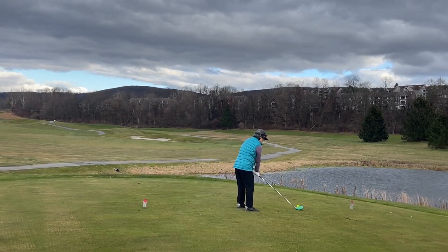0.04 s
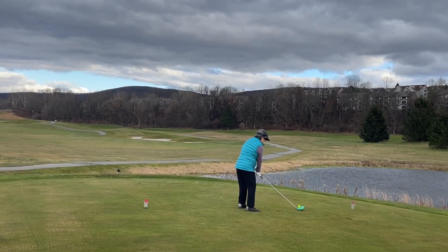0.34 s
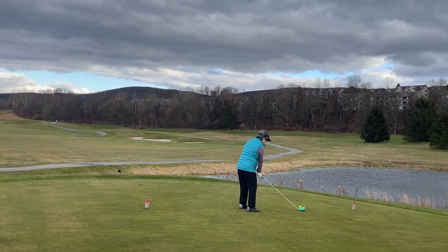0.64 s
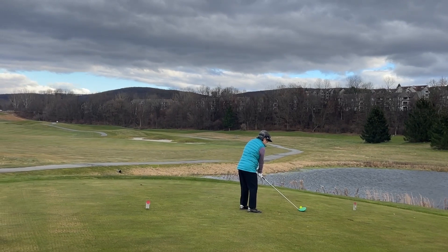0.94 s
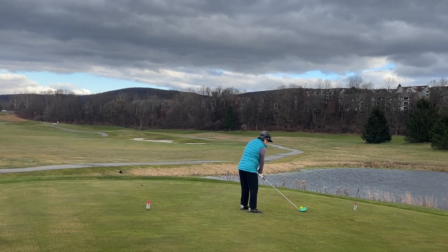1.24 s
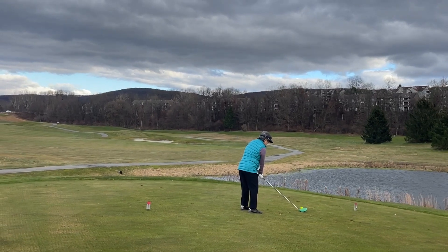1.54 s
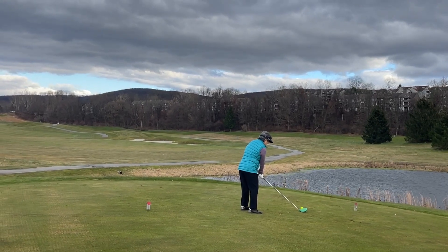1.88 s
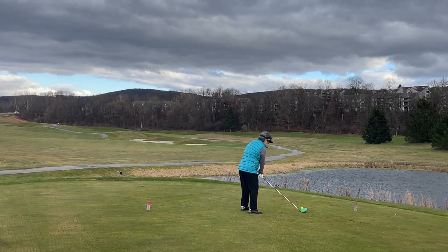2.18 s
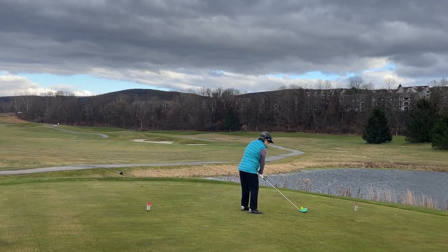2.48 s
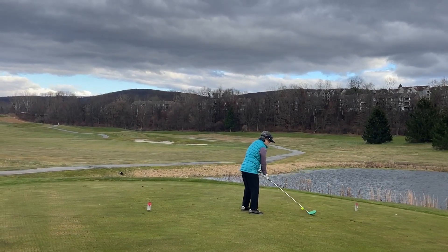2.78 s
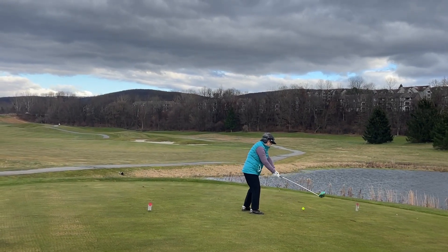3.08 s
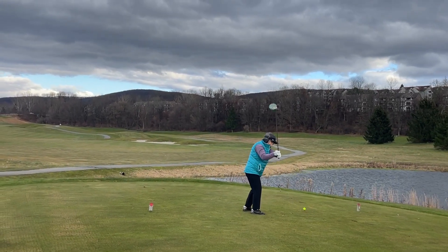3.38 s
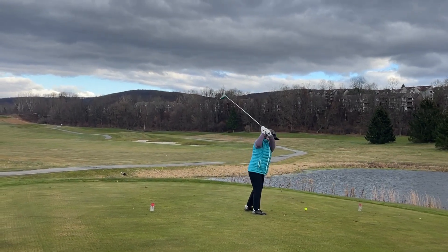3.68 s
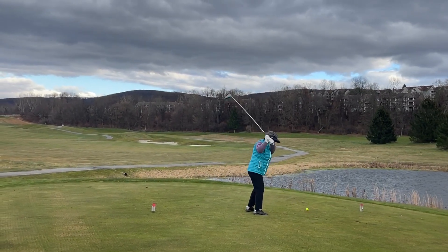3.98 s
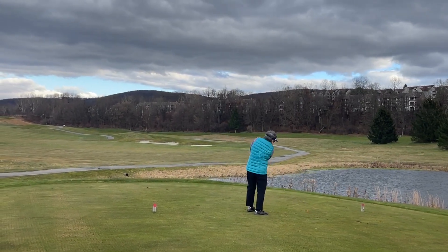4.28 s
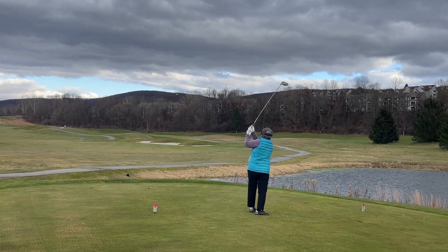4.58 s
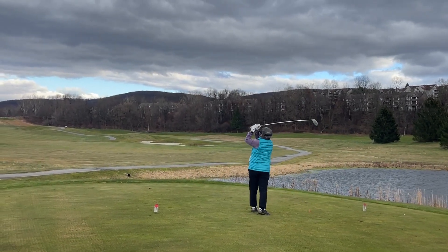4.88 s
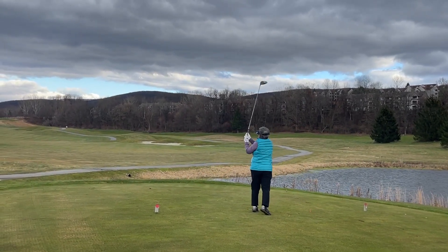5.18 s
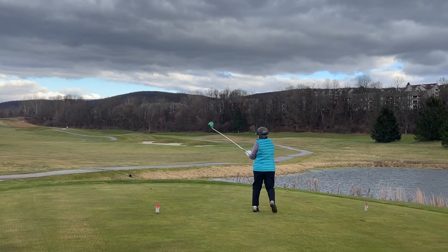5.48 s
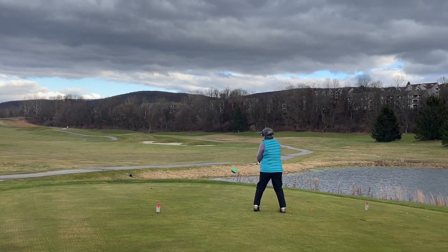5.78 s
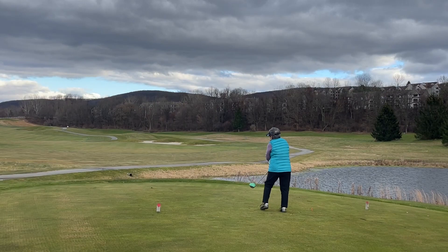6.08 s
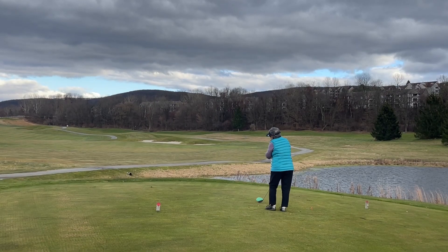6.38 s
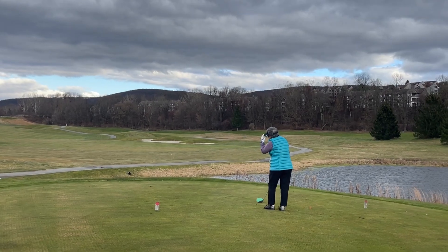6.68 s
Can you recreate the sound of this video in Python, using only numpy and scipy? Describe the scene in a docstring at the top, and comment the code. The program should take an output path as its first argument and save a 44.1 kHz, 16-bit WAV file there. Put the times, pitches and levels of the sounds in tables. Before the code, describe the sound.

A golf club strikes a ball with a single sharp, briefly ringing click amid gusty wind buffeting the microphone outdoors.

```python
"""A golfer drives a ball off an open tee on a gusty day, a few metres from the microphone.
From the start, turbulence rumbles, pops and thumps on the two microphone ports over a faint rush of trees.
A jacket rustles near 1 s and in the backswing. The hollow metal club head swishes down, cracks on the ball
at 4.26 s and rings on, rising in pitch by the Doppler effect as it stops receding.
The wind buffets hardest near 6.2 s, then eases."""
import sys
import numpy as np
from scipy import signal
from scipy.fft import rfft, irfft, next_fast_len
from scipy.io import wavfile
from scipy.ndimage import uniform_filter1d, minimum_filter1d, map_coordinates

SR = 44100
rng = np.random.default_rng(int(sys.argv[2]) if len(sys.argv) > 2 else 0)


def store_wav(level_fs):
    """Save 16-bit WAV to argv[1]."""
    pcm = np.round(np.clip(np.atleast_2d(level_fs), -1, 1) * 32767)
    wavfile.write(sys.argv[1], SR, pcm.T.astype(np.int16))


N = 301644

# the far surroundings: time_s, trees_db, hiss_db
BACKGROUND_LEVELS = [(0, -54, -72), (0.55, -54.5, -79), (1.0, -55.5, -75.5), (1.3, -55, -80.5),
                     (2.8, -56, -79), (3.5, -49, -71.5), (5.75, -50.5, -76.5), (6.2, -46, -74),
                     (6.6, -54, -77)]
# spectra of the trees, the high hiss and the wind's rumble: frequency_hz, relative_db
TREES_SPECTRUM = [(150, -2.5), (600, 5.5), (1500, -1), (2300, -10.5), (4800, -36), (14000, -100)]
HISS_SPECTRUM = [(3500, -13.5), (5000, -12.5), (6600, 0), (10500, -2), (11900, -13)]
RUMBLE_SPECTRUM = [(26, -21.5), (45, 1), (68, 4.5), (180, -6.5), (300, -18), (3000, -120)]
# likeness of diffuse sound at the two ports: frequency_hz, coherence
AIR_COHERENCE = [(500, 1), (700, .5), (1300, 0.33), (2400, 0.45), (5600, .95)]
# lead of the left port for sound from the course: frequency_hz, phase_rad
LEFT_LEAD = [(2000, 0), (3750, .6), (8900, -.5), (10250, -3.2), (13000, -6.4)]
# wind strength at the microphone: time_s, level_db
WIND_STRENGTH = [(0, -33.5), (0.65, -31.5), (0.78, -46), (1.0, -41.5), (1.64, -33.5), (1.85, -38),
                 (2.08, -32.5), (2.24, -42.5), (2.95, -45.5), (3.1, -34), (3.56, -34), (3.92, -39),
                 (4.2, -32.5), (4.48, -31.5), (5.9, -28), (6.22, -21), (6.52, -29), (6.84, -31)]
# small whirls in that wind: time_s, nominal_pitch_hz, rate_per_s, relative_db
SMALL_WHIRLS = [(0, 933, 228, 4), (1.65, 913, 137.4, -3), (1.8, 451.9, 87, -12), (2.5, 430, 59.3, 0.5),
                (3.5, 340.8, 55, -1), (4.6, 509.4, 86, -1.5), (6.2, 490, 130, -3)]
# large eddies that hit the ports: time_s, half_length_s, strength_db, edge_hz
LARGE_EDDIES = [(0.035, 0.037, -24.5, 474), (0.127, 0.012, -30, 1050), (0.204, 0.012, -32, 1010),
                (0.257, 0.003, -35, 1020), (0.284, 0.004, -33, 1150), (0.409, 0.0022, -35.5, 985),
                (0.423, 0.006, -33.5, 1050), (0.603, 0.0024, -35, 1390), (0.855, 0.014, -41, 482),
                (0.96, 0.0035, -41.5, 910), (1.033, 0.011, -37.5, 910), (1.244, 0.0023, -38, 970),
                (1.288, 0.0032, -36.5, 930), (1.333, 0.0018, -49, 980), (1.421, 0.0023, -43, 930),
                (1.485, 0.0074, -40, 885), (1.596, 0.018, -33.5, 706), (1.636, 0.0025, -38, 936),
                (1.95, 0.012, -38.5, 340), (3.449, 0.0037, -27, 768), (3.509, 0.0027, -30.5, 555),
                (3.538, 0.0024, -38.5, 512), (3.623, 0.0065, -37, 500.1), (3.741, 0.008, -23, 750),
                (4.015, 0.0074, -40, 372.2), (4.102, 0.008, -29.5, 1620), (4.115, 0.0095, -20, 940),
                (4.148, 0.0068, -26, 1070), (4.179, 0.0061, -29.5, 763), (4.214, 0.0062, -26.5, 783),
                (4.255, 0.012, -24.5, 915), (4.389, 0.018, -34.5, 817), (4.455, 0.0047, -36, 755),
                (4.533, 0.014, -26.5, 990), (4.66, 0.0014, -19, 696), (4.817, 0.011, -27, 879),
                (4.911, 0.005, -30.5, 1020), (4.936, 0.016, -31.5, 790), (5.023, 0.022, -25, 1116),
                (5.13, 0.011, -32.5, 854), (5.256, 0.005, -29, 765), (5.29, 0.0085, -29, 930),
                (5.406, 0.0073, -26, 995), (5.469, 0.0043, -27, 717), (5.664, 0.007, -32.5, 993),
                (5.72, 0.0047, -31.5, 792), (5.757, 0.003, -36.5, 626), (5.816, 0.01, -28, 930),
                (5.833, 0.0019, -19, 890), (6.049, 0.014, -15, 1080), (6.127, 0.019, -32.5, 1067),
                (6.204, 0.013, -20.5, 1360), (6.24, 0.018, -17, 1322), (6.301, 0.012, -21, 900),
                (6.349, 0.0081, -20, 1240), (6.428, 0.02, -25, 933), (6.766, 0.0079, -29, 1014)]
# spread of the wind's low middle between left and right: time_s, share
WIND_WIDTH = [(0.6, 1), (0.8, 0), (6.0, 0), (6.3, 1)]
# response of the ports' narrow ducts: frequency_hz, gain_db
DUCT_RESPONSE = [(310, 2), (650, -1.16), (930, -7), (1300, 0.5), (2200, 0)]
# the jacket as the golfer settles, then swings back: peak_s, half_length_s, level_db
JACKET_RUSTLES = [(1.08, 0.13, -81), (3.6, 0.19, -74)]
# spectra of the swish, the ball's knock, the shell's dense modes and their scatter off the ground:
# frequency_hz, relative_db
SWISH_SPECTRUM = [(700, -5.5), (1900, 3), (3500, -24.5), (12000, -29.5)]
KNOCK_SPECTRUM = [(150, -12), (500, -0.5), (1100, 12), (1800, 6.5), (2600, -4), (5000, -34.5), (13000, -24),
                  (15500, -20.5)]
SHELL_SPECTRUM = [(1500, -36), (2800, -21), (3700, -12), (4500, -19), (5400, -12), (9400, -3.5),
                  (11000, 8.5), (12300, -11)]
SCATTER_SPECTRUM = [(1500, -12), (3500, 2), (12300, -4.5)]
# strongly damped modes of the club face: nominal_pitch_hz, nominal_width_hz, relative_db
FACE_MODES = [(3620, 58, -4.5), (5150, 69, -4.5), (6900, 352, 8.5), (8740, 306, 4), (11180, 235, 4.5)]
# ringing modes of the head, as heard just after the blow: pitch_hz, relative_db, t60_s
HEAD_MODES = [(3742, 0, 0.39), (4035, -11, 0.14), (5455, -7, 0.58), (7160, -5, 0.095), (8700, -9, 0.08),
              (10765, 6, 0.1), (11490, -6, 0.088)]
# ring radiated towards the microphone as the head turns away: time_s, gain_db
HEAD_DIRECTIVITY = [(4.262, 0), (4.283, -4), (4.308, 1), (4.33, -22), (4.36, -13), (4.405, -21),
                    (4.43, -40)]

STRIKE_S = 4.2608
HISS_TOP_HZ, SHELL_TOP_HZ, BAND_LIMIT_HZ = 11950, 12500, 16400


def amp(db):
    """Amplitude ratio of a level in decibels."""
    return 10 ** (np.asarray(db) / 20)


def unit(x):
    """Normalisation to an rms of 1."""
    return x / np.sqrt(np.mean(x ** 2) + 1e-20)


def along(points, hz):
    """Interpolation of (frequency_hz, value) points on a logarithmic frequency axis."""
    frequencies, values = np.transpose(points)
    return np.interp(np.log(hz + 1), np.log(frequencies + 1), values)


def curves(rows):
    """Linear interpolation in time: one value per sample for each column after the first."""
    times, *columns = np.transpose(rows)
    return [np.interp(np.arange(N) / SR, times, column) for column in columns]


def wobble(knots_per_s):
    """Smooth random modulation: a spline through Gaussian values."""
    knots = rng.standard_normal(int(N * knots_per_s / SR) + 4)
    return map_coordinates(knots, [np.arange(N) * knots_per_s / SR])


def onset(age_s, attack_s):
    """Smooth growth of amplitude from 0 to 1."""
    return 1 - np.exp(-(age_s / attack_s) ** 2)


def filtered(x, response):
    """Linear filtering: the spectrum is multiplied by a frequency response."""
    size = next_fast_len(N + 8192)
    return irfft(rfft(x, size) * response(np.fft.rfftfreq(size, 1 / SR)), size)[..., :N]


def butter(x, edge_hz, kind, order):
    """Causal, maximally flat low-, high- or band-pass filtering."""
    return signal.sosfilt(signal.butter(order, edge_hz, kind, fs=SR, output="sos"), x)


def noise(spectrum, channels):
    """Spectral shaping of independent white noises, at rms 1."""
    return unit(filtered(rng.standard_normal((channels, N)), lambda hz: amp(along(spectrum, hz))))


def noise_pair(spectrum, top_hz):
    """Band limiting of two independent shaped noises, at rms 1."""
    return unit(filtered(noise(spectrum, channels=2), lambda hz: hz < top_hz))


def diffuse(pair):
    """Partial coherence: two independent sounds mix into left and right as sum and difference."""
    angle = lambda hz: np.arccos(np.clip(along(AIR_COHERENCE, hz), -1, 1)) / 2
    mid, side = filtered(pair, lambda hz: np.array([np.cos(angle(hz)), np.sin(angle(hz))]))
    return np.array([mid + side, mid - side])


def add(track, start_s, sound):
    """Superposition of a sound on a track."""
    at = round(start_s * SR) + np.arange(sound.shape[-1])
    inside = (at >= 0) & (at < N)
    track[:, at[inside]] += sound[:, inside]


def arriving(sound):
    """Phase difference: sound from the course reaches the ports out of step, most in the high treble."""
    return filtered(sound, lambda hz: np.exp(.5j * np.array([[1], [-1]]) * along(LEFT_LEAD, hz)))


def surroundings():
    """Diffuse field: wind in distant trees and a thin high hiss, partly coherent at the ports."""
    trees_db, hiss_db = curves(BACKGROUND_LEVELS)
    trees = amp(trees_db + 1.2 * wobble(6.1)) * diffuse(noise(TREES_SPECTRUM, channels=2))
    hiss = amp(hiss_db + 1.2 * wobble(16)) * diffuse(noise_pair(HISS_SPECTRUM, HISS_TOP_HZ))
    return trees + hiss


def lull(wake_s=.05):
    """Intermittency: 0 in the stirred air at a large eddy, rising to 1 in the calm on either side."""
    t = np.arange(N) / SR
    times = np.array([time_s for time_s, *_ in LARGE_EDDIES])
    nearest = np.round(np.interp(t, times, np.arange(len(times)))).astype(int)
    return 1 - np.exp(-np.square((t - times[nearest]) / wake_s))


def pops(pitch_hz, rate_per_s, clump):
    """Pressure pulses: each small whirl flicks one port with a brief swing that slows as it dies."""
    passed = np.cumsum(rate_per_s * clump) / SR
    count = int(passed[-1])
    timing, pitch, strength, polarity, port = rng.random((count, 5)).T
    at = np.minimum(np.searchsorted(passed, np.arange(count) + timing), N - 1)
    hz = pitch_hz[at] * 2 ** (1.86 * (pitch - .5))
    size = amp(21 * (strength - 1)) * np.sign(polarity - .5) * np.sqrt(hz)
    steps = np.arange(SR // 40)
    cycles = 2 * np.log1p(hz[:, None] * steps / SR * 0.69)
    swings = size[:, None] * np.sin(2 * np.pi * cycles) * np.exp(-((cycles - 1) / 0.65) ** 2)
    samples = (at[:, None] + steps).ravel()
    on_right = (port < .5)[:, None]
    pair = np.array([np.bincount(samples, (swings * hit).ravel(), N)[:N] for hit in (~on_right, on_right)])
    return unit(butter(pair, 1090, "low", order=6) / np.sqrt(rate_per_s))


def buffeting(gust_db=3.5, rumble_dip_db=4.5, pops_dip_db=8):
    """Turbulent pressure: rumble and pops follow one wind strength and sink between the large eddies."""
    wind_db, = curves(WIND_STRENGTH)
    pitch_hz, rate_per_s, pops_db = curves(SMALL_WHIRLS)
    gust, calm = wobble(22), lull()
    rumble = unit(noise(RUMBLE_SPECTRUM, channels=1) * amp(gust_db * gust))
    clump = 1 + np.tanh(1.8 * wobble(95) + .4 * gust)
    popping = unit(pops(pitch_hz, rate_per_s, clump) * np.sqrt(clump))
    return amp(wind_db) * (amp(-rumble_dip_db * calm) * rumble + amp(pops_db - pops_dip_db * calm) * popping)


def eddies(typical_db=-28, typical_edge_hz=1000, lag_cycles=.7):
    """Pressure transients: a short eddy hits the ports as a single push, a long one as a ragged burst."""
    track = np.zeros((2, N))
    t = np.arange(-SR // 20, SR // 8) / SR
    equal_energy = lambda x: x / np.sqrt(np.mean(np.sum(x ** 2, -1)) / (.03 * SR))
    ragged = amp(4.8 * wobble(220))
    for time_s, half_s, strength_db, edge_hz in LARGE_EDDIES:
        # it arrives abruptly and dies away more slowly
        envelope = np.where(t < 0, np.exp(-(t / half_s) ** 2), 1 / np.cosh(1.33 * t / half_s))
        burst = rng.standard_normal((3, len(t))) * envelope * np.roll(ragged, -round(time_s * SR))[:len(t)]
        push = (t == 0) * rng.uniform(0.23, 1, (3, 1))
        push_share = .85 * np.exp(-(half_s / .0045) ** 2)
        swirl = np.sqrt(1 - push_share) * equal_energy(burst) + np.sqrt(push_share) * equal_energy(push)
        # the pressure falls off with frequency, steeply above the smallest whirls
        flutter = butter(swirl[:2], 428, "low", order=1)
        flutter = butter(flutter, 1.306 * edge_hz, "low", order=6)
        flutter = butter(flutter, 201, "high", order=2)
        crackle = amp(-32) * butter(burst[:2], HISS_TOP_HZ, "low", order=4)
        rasp = butter(burst[:2], 2900, "low", order=7) + crackle
        rasp = butter(rasp, edge_hz, "high", order=2)
        # the microphone's bass cut rings for a cycle or two after the push
        thump = butter(swirl[2], 46, "high", order=3)
        thump = butter(thump, 157.4, "low", order=3)
        # slow, wide eddies push more bass; small, fast ones rasp more
        excess_db, octaves = strength_db - typical_db, np.log2(edge_hz / typical_edge_hz)
        flutter = amp(-26.5 + excess_db) * equal_energy(flutter)
        thump = amp(-29.5 + 0.93 * excess_db - 6.5 * octaves) * equal_energy(thump)
        rasp = amp(-62.5 + 1.4 * excess_db + 12 * octaves) * (1 - push_share) * equal_energy(rasp)
        add(track, time_s + t[0], flutter + thump + rasp)
    # group delay: each frequency trails by lag_cycles of its own periods, so thumps sweep downwards
    return filtered(track, lambda hz: np.exp(-2j * np.pi * lag_cycles * np.log(hz + 20)))


def ports(wind, merge_hz=566.2):
    """Stereo width: the wind's bass is merged to the centre, its higher flutter stays left and right."""
    width, = curves(WIND_WIDTH)
    difference = (wind[0] - wind[1]) / 2
    apart = lambda order: filtered(difference, lambda hz: 1 / np.sqrt(1 + (merge_hz / (hz + 1)) ** order))
    side = width * apart(order=9) + (1 - width) * apart(order=26)
    return filtered(wind.mean(0) + np.array([side, -side]), lambda hz: amp(along(DUCT_RESPONSE, hz)))


def jacket(band_hz=(2900, 5000), rough_db=2.2, strokes_per_s=60):
    """Friction noise: the jacket rubs in short, uneven strokes as the arms move."""
    t = np.arange(N) / SR
    motion = sum(amp(db) * np.exp(-np.square((t - peak_s) / half_s)) for peak_s, half_s, db in JACKET_RUSTLES)
    strokes = amp(rough_db * wobble(strokes_per_s))
    return motion * strokes * unit(butter(rng.standard_normal(N), band_hz, "band", order=2))


def swish(peak_s=4.22, peak_db=-46, rise_db_per_s=105, fall_db_per_s=189.5):
    """Aerodynamic noise: air rushes round the club head, loudest just before the blow."""
    t = np.arange(N) / SR - peak_s
    level_db = peak_db + np.minimum(rise_db_per_s * t, -fall_db_per_s * t)
    return amp(level_db) * diffuse(noise_pair(SWISH_SPECTRUM, HISS_TOP_HZ))


def ball_knock(peak_db=-6):
    """Impulse response: the ball's brief contact with the face is one push, heard as a dull knock."""
    push = np.zeros(N)
    push[round((STRIKE_S + .0007) * SR)] = -1
    knock = filtered(push, lambda hz: amp(along(KNOCK_SPECTRUM, hz)))
    return amp(peak_db) * knock / np.abs(knock).max()


def shell_crack(age_s, attack_s=.0005, turf_delay_s=.0026):
    """Reflection and scattering: the shell's dense modes arrive direct, off the turf, then from afar."""
    decay = lambda db, t60_s, t=age_s: amp(db - 60 * t / t60_s)
    bounce_age_s = np.maximum(age_s - turf_delay_s, 0)
    direct = decay(db=-6, t60_s=.010)
    bounce = decay(db=-7, t60_s=.013, t=bounce_age_s) * onset(bounce_age_s, attack_s)
    tail = decay(db=-21, t60_s=.09)
    crack = noise_pair(SHELL_SPECTRUM, SHELL_TOP_HZ)[0] * (direct + bounce + tail)
    scatter = decay(db=-50, t60_s=.55) * diffuse(noise_pair(SCATTER_SPECTRUM, SHELL_TOP_HZ))
    return onset(age_s, attack_s) * (crack + scatter)


def head_ring(age_s, away_m_per_s=23, braking_m_per_s2=150, reference_m_per_s=21):
    """Doppler effect: the damped modes of head and face rise in pitch as the head stops receding."""
    speed = np.maximum(away_m_per_s - braking_m_per_s2 * age_s, 0)
    # the head's modes sound at their listed pitch when it recedes at the reference speed
    clock_s = np.cumsum((age_s > 0) * (343 + reference_m_per_s) / (343 + speed)) / SR
    # each mode's phase wavers as the head twists
    mode = lambda hz: np.sin(2 * np.pi * hz * clock_s + .3 * wobble(300))
    ring = sum(amp(db - 60 * age_s / t60_s) * mode(hz) for hz, db, t60_s in HEAD_MODES)
    facing_db, = curves(HEAD_DIRECTIVITY)
    # random swings of level stand for the turf's echo adding and cancelling as the head moves
    interference_db = 3.5 * np.minimum(age_s / .04, 1) * wobble(170)
    ring = ring * amp(facing_db + interference_db - 22)
    face = sum(amp(db - 8) * np.exp(-.8 * np.pi * width_hz * age_s) * mode(hz * 1.008)
               for hz, width_hz, db in FACE_MODES)
    return onset(age_s, attack_s=.0016) * (ring + face)


def drive():
    """Impact excitation: one blow sets off the head's ring, the shell's crack and the ball's knock."""
    age_s = np.maximum(np.arange(N) / SR - STRIKE_S, 0)
    return head_ring(age_s) + shell_crack(age_s) + ball_knock()


def scene():
    """Superposition of sound from the course and the wind's own pressure on the ports."""
    course = jacket() + swish() + drive() + surroundings()
    return arriving(course) + ports(eddies() + buffeting())


def record(dry):
    """Peak and band limiting: a smoothed gain turns down the highest peaks; a steep low-pass follows."""
    needed = np.minimum(1, .9 / (np.abs(dry).max(0) + 1e-9))
    held = minimum_filter1d(needed, size=49)
    gain = uniform_filter1d(uniform_filter1d(held, size=25), size=25)
    fade_in = np.minimum(np.arange(N) / (.003 * SR), 1)
    return filtered(dry * gain * fade_in, lambda hz: 1 / (1 + (hz / BAND_LIMIT_HZ) ** 100))


dry = scene()
out = record(dry)
store_wav(out)
```